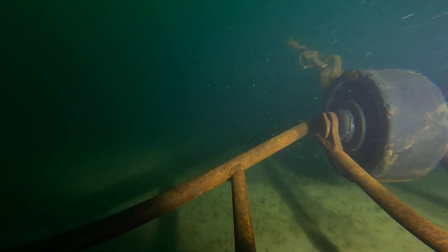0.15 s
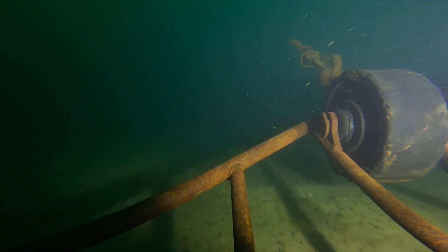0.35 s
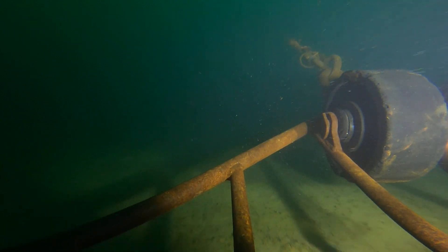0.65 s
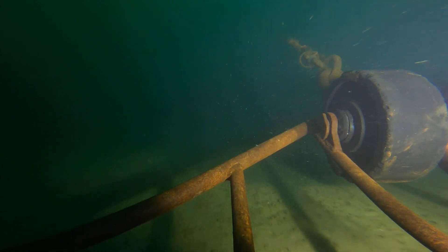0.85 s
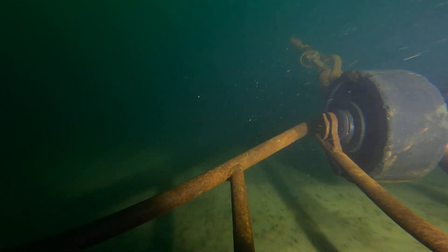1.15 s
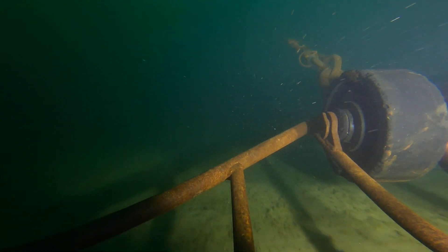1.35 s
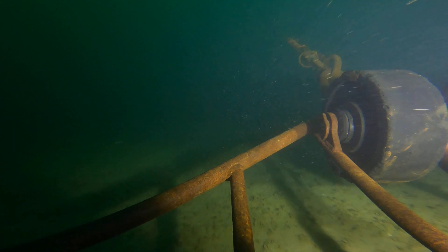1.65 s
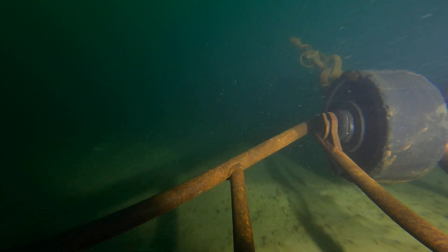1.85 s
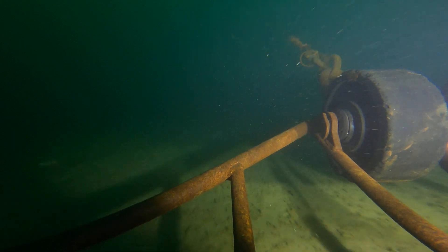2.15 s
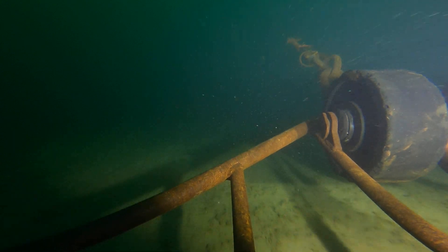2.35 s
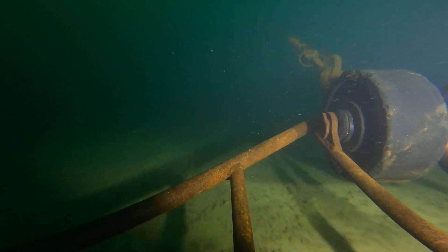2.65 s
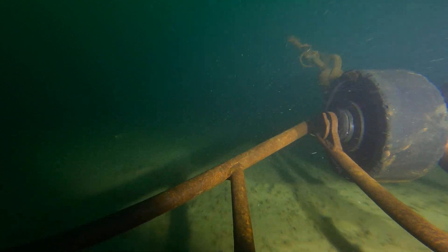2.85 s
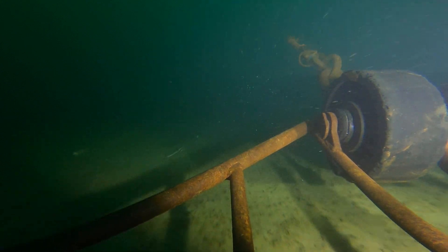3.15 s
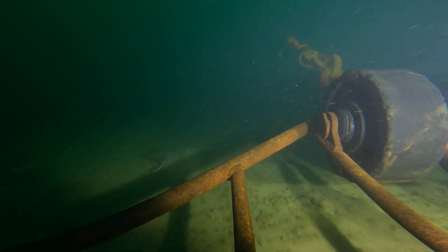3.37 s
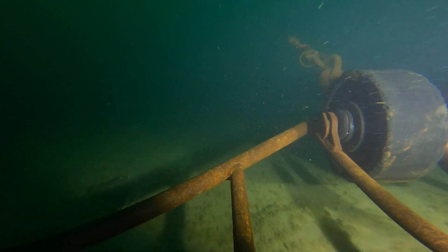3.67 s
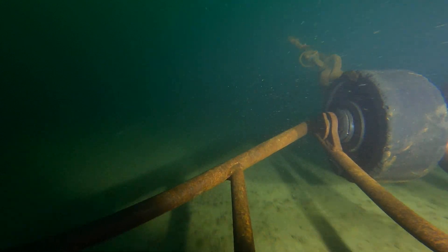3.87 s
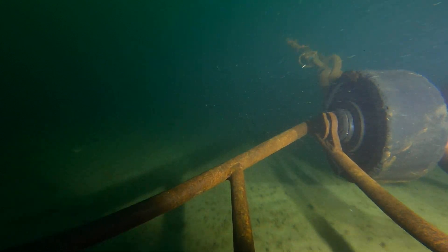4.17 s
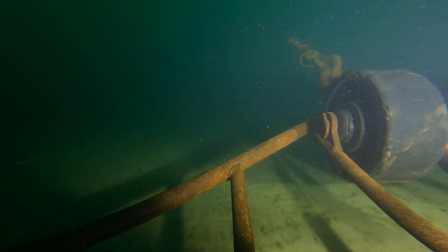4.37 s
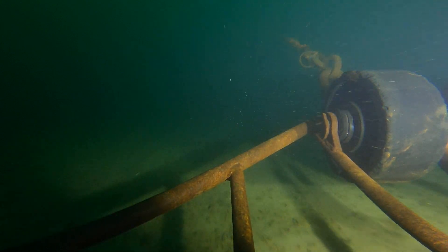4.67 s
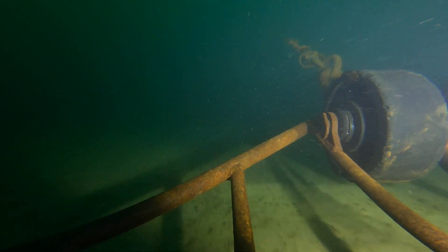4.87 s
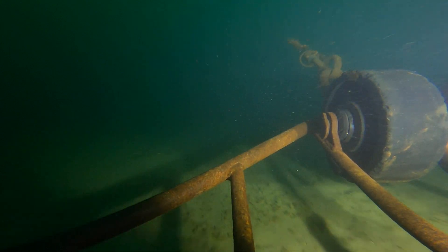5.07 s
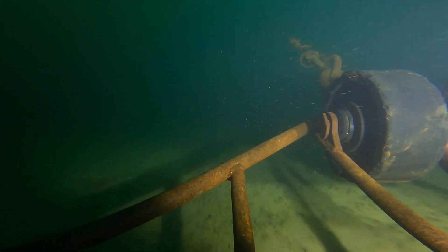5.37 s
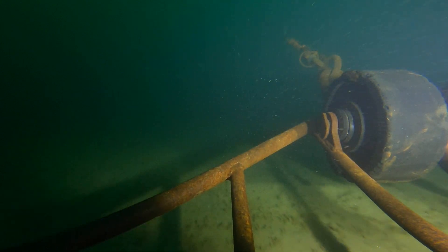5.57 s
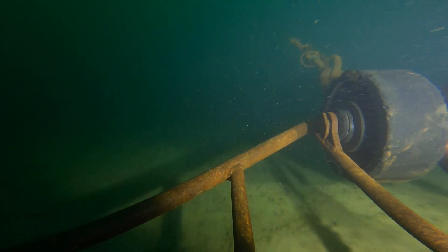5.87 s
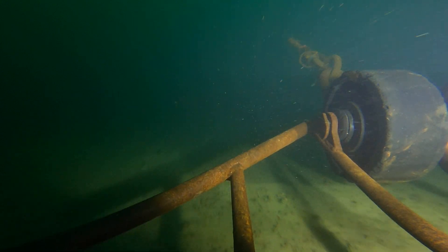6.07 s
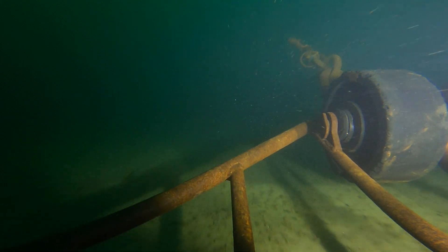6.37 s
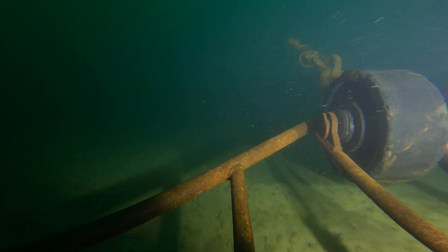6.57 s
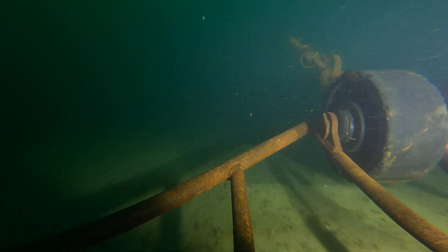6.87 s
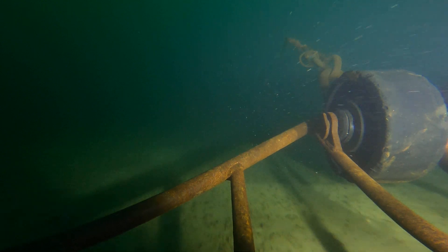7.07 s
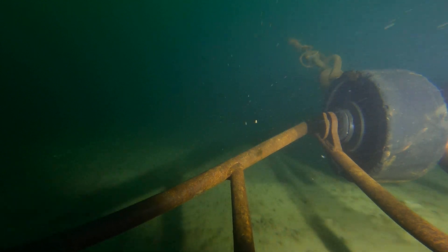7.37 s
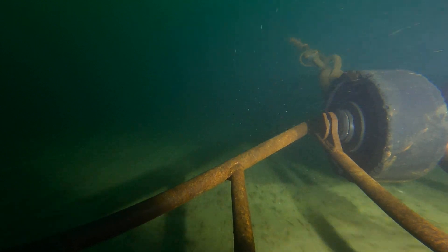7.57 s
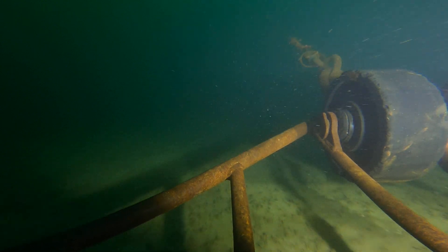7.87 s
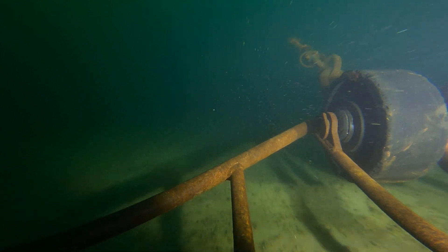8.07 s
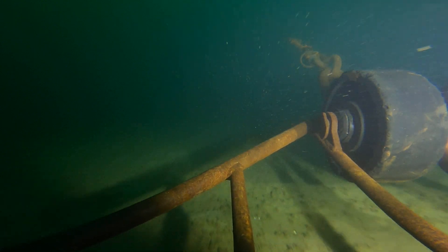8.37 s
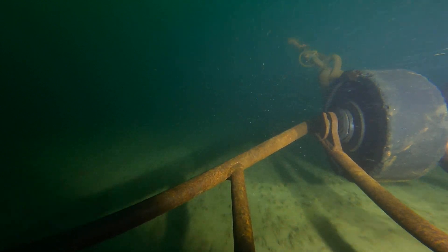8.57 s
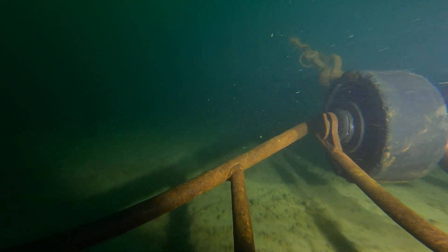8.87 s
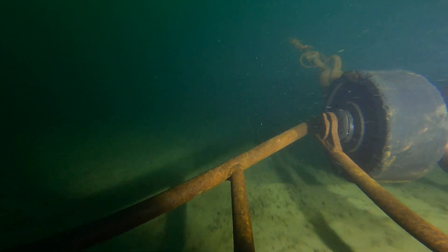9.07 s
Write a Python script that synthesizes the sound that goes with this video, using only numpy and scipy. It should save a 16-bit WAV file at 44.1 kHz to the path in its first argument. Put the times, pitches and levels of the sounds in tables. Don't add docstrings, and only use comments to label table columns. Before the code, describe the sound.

A metal frame is towed along a sandy seabed, heard through its own mount by a sealed stereo device. A deep wobbling drone dominates, fluttering and briefly dropping out. Over it come grainy dragging, short ringing metallic knocks, stone snaps, shell cracks and loose-link ticks at random intervals. Occasional low lurches swell the rumble; quick level control keeps everything dense and even.

```python
import sys
import numpy as np
from scipy import signal
from scipy.io import wavfile

SR = 44100
rng = np.random.default_rng(int(sys.argv[2]) if len(sys.argv) > 2 else 0)


def bounce(signal):
    frames = np.transpose(np.atleast_2d(signal))
    limited = np.clip(frames, -1, 1)
    pcm = np.round(limited * 32767).astype(np.int16)
    wavfile.write(sys.argv[1], SR, pcm)


def natural_amplitude(level_db):
    exponent = np.asarray(level_db, float) / 20
    return 10 ** exponent


N = 407043
MID_HZ, HIGH_HZ, TOP_HZ = 2000, 3300, 5600


def rms_one(x):
    return x / np.sqrt(np.mean(x ** 2) + 1e-20)


def in_time(rows):
    s, *columns = np.transpose(rows)
    return [np.interp(np.arange(N) / SR, s, column) for column in columns]


def drift(rate):
    r = np.exp(-80 * np.pi * rate / SR)
    slow = signal.lfilter([1], [1, -2 * r, r * r], rng.standard_normal(N // 40 + 2002))[2000:]
    return np.interp(np.arange(N) / 40, np.arange(len(slow)), rms_one(slow))


def cut(x, hz, kind, order):
    return signal.sosfilt(signal.butter(order, hz, kind, fs=SR, output="sos"), x)


def resonate(x, hz, width_hz):
    r, w = np.exp(-np.pi * width_hz / SR), 2 * np.pi * hz / SR
    return signal.lfilter([2 * (1 - r) * np.sin(w)], [1, -2 * r * np.cos(w), r * r], x)


def shaken(hz, width_hz):
    noise = rng.standard_normal(N + SR)
    return rms_one(resonate(resonate(noise, hz, width_hz), hz, width_hz)[SR:])


def contacts(table, ring_ms):
    found = []
    for s, level_db, rise_ms, fall_ms, colour_db in table:
        rise_ms, fall_ms = max(rise_ms, .1), max(fall_ms, .3)
        ms = np.arange(-5 * rise_ms, 6 * fall_ms, 1000 / SR)
        force = natural_amplitude(level_db - 5.08 * np.where(ms < 0, -ms / rise_ms, ms / fall_ms))
        force = force * np.sqrt(1 + ring_ms / (rise_ms + fall_ms))
        found.append((int(s * SR + ms[0] * SR / 1000), force, colour_db))
    return found


def add(track, found, boost_db, colour_share, scatter_db):
    luck = rng.standard_normal(len(found))
    for (at, force, colour_db), chance in zip(found, luck):
        gain = natural_amplitude(boost_db + colour_share * colour_db + scatter_db * chance)
        track[at:at + len(force)] += (force * gain)[:N - at]


# [t/s, level/dB]
LURCHES = [
    (0.038, -20),
    (2.094, -13),
    (2.663, -16),
    (4.584, -18.5),
    (5.103, -14),
    (5.978, -22.5),
]


def rumble():
    lurch_ms, lurch_boost_db = 46, 10
    band = signal.butter(2, [18, 75], "band", fs=SR, output="sos")
    t, level = np.arange(N) / SR, natural_amplitude(-25.5)
    for s, db in LURCHES:
        bell = np.exp(-((t - s) * 1000 / lurch_ms - 1) ** 2)
        level = level + natural_amplitude(db - 15.5 + lurch_boost_db) * bell
    return level * rms_one(signal.sosfilt(band, rng.standard_normal(N + SR))[SR:])


# [t/s, length/s, level/dB]
SAND_SWELLS = [(0.163, 0.051, -30.5), (0.383, 0.044, -28.5), (0.523, 0.095, -26.5), (0.722, 0.08, -34),
               (0.885, 0.27, -32), (1.567, 0.082, -23), (1.853, 0.14, -27), (2.042, 0.034, -26.5),
               (2.212, 0.22, -25), (2.618, 0.1, -36), (2.842, 0.34, -28.5), (3.347, 0.12, -23.5),
               (4.51, 0.062, -25.5), (4.93, 0.059, -31.5), (5.176, 0.036, -28.5), (5.5, 0.038, -26.5),
               (5.682, 0.1, -30), (5.87, 0.085, -28), (6.138, 0.21, -25.5), (6.75, 0.046, -29),
               (6.9, 0.31, -28), (7.363, 0.37, -22.5), (7.87, 0.078, -35), (8.1, 0.049, -24.5),
               (8.473, 0.043, -31), (8.59, 0.048, -31), (8.702, 0.058, -26.5), (8.936, 0.21, -22.5)]


def swells():
    rise_s, fall_s, rest_db = 0.023, 0.02, -35.5
    t, power = np.arange(N) / SR, natural_amplitude(2 * rest_db)
    for s, length_s, db in SAND_SWELLS:
        before = np.maximum((s - t) / rise_s, 0)
        after = np.maximum((t - s - length_s) / fall_s, 0)
        power = power + natural_amplitude(2 * db) * np.exp(-2 * np.minimum(before + after, 20))
    return np.sqrt(power)


# [t/s, f/Hz, level/dB]
HUM_PITCH = [(0.0, 93.15, -15), (1.02, 91.4, -14), (1.07, 96.2, -14.5), (2.38, 95.3, -14.5),
             (2.48, 102.1, -13.5), (2.74, 93.06, -14), (5.68, 93.5, -15.5), (5.81, 98.73, -15.5),
             (6.07, 89.87, -14.5), (6.37, 98.1, -13), (6.68, 94.3, -15.5), (6.89, 99.8, -12.5),
             (7.07, 92.2, -16), (7.42, 94.6, -15.5), (7.55, 90.25, -15), (7.73, 92.46, -12),
             (8.93, 92.4, -16), (9.19, 89.1, -15)]
# [t/s, half width/ms, share left (+ makes the pitch leap up)]
HUM_NULLS = [(0.306, 17, -0.0033), (0.414, 26, -0.22), (0.492, 20, 0.2), (0.575, 17, 0.4),
             (0.628, 8.2, -0.6), (0.686, 24, -0.28), (0.73, 7.1, 0.3), (0.82, 11, 0.16), (1.092, 12, 0.25),
             (1.144, 6.6, 0.25), (1.35, 20, -0.47), (1.456, 21, 0.4), (1.973, 2.4, 0.46), (2.087, 16, -0.3),
             (2.127, 6.9, 0.26), (2.228, 8.4, -0.3), (2.341, 24, 0.28), (2.479, 30, -0),
             (2.607, 32.9, -0.3), (2.638, 9.4, 0.4), (2.683, 15, -0.28), (2.988, 21, -0.3),
             (3.322, 11.3, -0.3), (3.371, 32, -0.15), (3.408, 11, -0.32), (3.573, 16, 0.3),
             (3.666, 24, 0.078), (3.851, 16, 0.42), (4.003, 27, 0.094), (4.055, 30, -0.38),
             (4.978, 7.5, -0.45), (5.02, 38, -0.29), (5.155, 23, -0.035), (5.349, 13.5, -0),
             (5.485, 6.8, 0.0051), (5.687, 27, 0), (5.902, 7.6, 0.4), (6.009, 7.5, 0.32), (6.127, 10, 0.1),
             (6.246, 30, -0.4), (6.329, 9, -0), (6.378, 9.7, 0.4), (6.432, 9.6, 0.5), (6.844, 24.2, 0.13),
             (6.874, 6.6, 0.03), (6.913, 23, -0.64), (7.438, 13, 0.5), (7.531, 11, -0.35),
             (7.748, 35, 0.68), (7.823, 27, 0.07), (7.881, 17, 0.1), (7.945, 15, 0.4), (8.05, 8.7, -0.13),
             (8.097, 33, 0), (8.296, 39, -0.3), (8.418, 13, 0.37), (8.719, 25, -0.2), (8.801, 12, -0.6),
             (9.013, 4.3, 0.2), (9.213, 2.3, 0.12)]


def hum():
    pitch_hz, first_db = in_time(HUM_PITCH)
    swing = np.sqrt(2) * np.exp(2j * np.pi * np.cumsum(pitch_hz + 2.53 * drift(8.9)) / SR)
    for s, half_ms, left in HUM_NULLS:
        reach = 1.4 * half_ms * SR / 1000
        start, stop = max(int(s * SR - 4 * reach), 0), min(int(s * SR + 4 * reach), N)
        u = (np.arange(start, stop) - s * SR) / reach
        swing[start:stop] *= np.tanh(u) - 1j * left / np.cosh(u)
        swing[:start] *= -1
    first = swing.imag + natural_amplitude(-13) * shaken(108, 24) + natural_amplitude(-11.5) * shaken(78, 27)
    second = shaken(174.7, 12.2) + natural_amplitude(-6.0) * shaken(183.4, 47)
    return natural_amplitude(first_db + 3.5) * first + swells() * second


# [t/s, level/dB]
RIPPLE_DROPS = [(0.564, -37), (0.731, -50), (1.122, -55), (1.5, -52), (1.829, -40), (3.081, -44),
                (3.33, -33.5), (3.865, -63), (4.09, -46), (4.716, -39), (4.941, -50), (5.649, -47),
                (6.738, -48), (7.917, -50), (8.105, -65), (8.922, -34)]


def thuds():
    force = natural_amplitude(-52.5 + 3.5 * drift(10))
    add(force, contacts([(s, db, 3.0, 14.0, 0) for s, db in RIPPLE_DROPS], 34.0), -1.5, 0, 0)
    return natural_amplitude(27.0) * cut(resonate(force * rng.standard_normal(N), 300, 210), 420, "low", order=4)


# [t/s, level/dB]
PORT_GRAINS = [
    (0.1027, -55.5),
    (0.282, -56),
    (2.0882, -56),
    (2.2044, -60),
    (5.421, -57.5),
    (6.003, -45.5),
    (7.3951, -58),
    (8.7161, -63),
    (8.9542, -53.5),
]


def sparks():
    force = np.zeros(N)
    add(force, contacts([(s, db, .4, 2.5, 0) for s, db in PORT_GRAINS], 0), 3.0, 0, 0)
    both, apart = force * rng.standard_normal((2, N))
    hiss = np.array([both + .3 * apart, both - .3 * apart])
    return cut(cut(hiss, 9500, "high", order=4), 14000, "low", order=4)


def grains():
    strikes = rng.random(N) < 300 * natural_amplitude(5 * drift(14)) / SR
    strength = natural_amplitude(6.7 * np.minimum(rng.exponential(1, N), 3.2))
    return rms_one(signal.lfilter([1], [1, -.97], strikes * strength))


# [t/s, level/dB, fall/ms]
BUMPS = [(.545, -18, 4.6), (1.406, -18, 5), (1.541, -20, 8), (1.841, -15, 9.5), (2.154, -15, 8.5),
         (2.461, -18.5, 4), (2.705, -16.5, 7), (2.945, -12.5, 6.3), (3.079, -16.5, 13), (3.148, -20.5, 9),
         (3.327, -17, 45), (3.569, -27, 5.6), (3.628, -25, 3.1), (3.865, -21, 15), (4.126, -21, 5.8),
         (4.277, -21, 2.5), (4.487, -17, 5.4), (5.288, -20.5, 2.82), (5.613, -24.5, 12), (5.87, -18.5, 7.6),
         (6.569, -19, 18), (6.886, -15, 6.9), (6.97, -19, 6.3), (7.589, -17.5, 11.3), (7.962, -22, 30),
         (8.105, -15.5, 7.9), (8.216, -23.5, 4.72), (8.598, -14.5, 11.2), (8.615, -22, 0.67),
         (9.018, -15.5, 15)]
# [t/s, level/dB, fall/ms]
CLACKS = [(.062, -24, 15), (.398, -25.5, 10), (.923, -29, 5.9), (1.094, -31, 3.2), (1.332, -23.5, 6.4),
          (1.953, -17, 12), (2.114, -20.5, 12), (2.295, -16.5, 17), (2.839, -18, 23), (3.226, -13.5, 8.7),
          (4.252, -13, 6.3), (4.709, -14, 7.1), (5.105, -27, 22.5), (5.341, -16.5, 22), (5.407, -12, 12.5),
          (5.773, -17, 8.4), (6.134, -14, 21), (6.196, -15, 5.2), (6.943, -17, 8.4), (7.191, -28, 5.8),
          (7.402, -14, 10.3), (7.472, -19, 7.27), (7.846, -19.5, 5.5), (7.922, -22, 3.9),
          (8.148, -16.5, 2.9), (8.297, -28.5, 14), (8.429, -18, 14), (8.448, -26.5, 12), (8.954, -17, 26),
          (9.157, -23, 10.5)]
# [t/s, level/dB, fall/ms]
SNAPS = [(.129, -41, 0.79), (.91, -26, 1.5), (1.17, -28, 3.5), (1.281, -26.5, 1.5), (2.733, -15.5, 5),
         (3.492, -20, 4), (4.607, -25.5, 22), (4.817, -29, 1.3), (4.852, -38, 0.92), (4.946, -31.5, 5.1),
         (5.18, -21.5, 5.3), (5.856, -20.5, 1.5), (6.003, -16.5, 4.7), (6.112, -21.5, 6),
         (6.156, -22.5, 1.1), (7.67, -20, 1.8), (8.706, -26, 8.2), (4.594, -31, 3.3), (4.36, -40, 4.5),
         (8.848, -24.5, 2.44), (9.113, -22.5, 0.51)]
# [t/s, level/dB]
RUBS = [
    (.31, -45),
    (.815, -36),
    (.955, -29.5),
    (2.572, -24),
    (6.276, -38),
    (6.37, -27),
    (6.456, -36),
    (7.336, -26.5),
    (8.545, -24),
    (1.625, -36),
]


def knocks():
    bump_mid_db, clack_mid_db, snap_mid_db = -20.5, -10, -1
    table = []
    for hits, mid_db in [(BUMPS, bump_mid_db), (CLACKS, clack_mid_db), (SNAPS, snap_mid_db)]:
        table += [(s, db, 1.1, fall_ms, mid_db) for s, db, fall_ms in hits]
    table += [(s, db, 3.0, 5.7, bump_mid_db) for s, db in RUBS]
    return contacts(table, 10.0)


# [t/s, level/dB, fall/ms]
LINK_TICKS = [(.082, -32, 0.58), (.588, -32, 0.88), (1.314, -42, 2.9), (2.295, -22, 4.1), (2.841, -26, 2.6),
              (3.117, -37.5, 1.2), (3.504, -36.5, 1.6), (4.249, -29, 3), (5.342, -28.5, 6.3),
              (5.773, -39, 4.6), (6.134, -22, 1.7), (6.156, -32, 4.8), (7.406, -23.5, 3), (7.545, -35, 1.5),
              (7.863, -42.5, 2), (8.142, -34, 3.1), (8.43, -23, 2.7), (8.504, -35, 1.3), (9.019, -18, 2.7)]
# [t/s, level/dB, fall/ms]
SHELL_CRACKS = [(.102, -27, 0.65), (.251, -32.5, 4.8), (.298, -41.5, 21), (.91, -31.5, 1.7),
                (1.171, -41.5, 2.7), (1.481, -31.5, 1.6), (2.44, -32, 1.6), (2.736, -25, 1.3),
                (2.944, -35.5, 2.5), (3.178, -36, 1.3), (3.265, -40, 1.8), (3.329, -42, 1.2),
                (3.452, -35, 3.4), (4.621, -25.5, 2.3), (4.818, -36, 1.1), (5.15, -30.5, 5.4),
                (5.38, -34, 10), (5.555, -37, 8.8), (5.858, -30, 1.5), (6.003, -18, 1.2), (6.366, -44, 2.1),
                (6.453, -37.5, 5.2), (6.548, -42, 1.36), (6.813, -37.5, 4.9), (6.945, -33.5, 7.95),
                (7.137, -42, 5.77), (7.479, -34, 8.8), (7.669, -35, 2.21), (8.565, -45, 1.83),
                (8.954, -23, 11)]
# [t/s, level/dB, half length/ms]
SAND_SCUFFS = [(1.86, -39.5, 68), (2.112, -24.5, 6.2), (3.404, -34, 11), (5.17, -34, 6.7),
               (5.428, -19.5, 3.5), (6.046, -31.5, 7.8), (6.066, -30.5, 2.3), (6.409, -26, 4.7),
               (6.617, -30.5, 8.4), (8.646, -45, 1.5), (8.719, -33.5, 2.1)]


def ticks():
    link_top_db, shell_top_db, scuff_top_db = -33.5, -20, -17.5
    table = []
    for hits, top_db in [(LINK_TICKS, link_top_db), (SHELL_CRACKS, shell_top_db)]:
        table += [(s, db, 0.62, fall_ms, top_db) for s, db, fall_ms in hits]
    table += [(s, db, half_ms, half_ms, scuff_top_db) for s, db, half_ms in SAND_SCUFFS]
    return contacts(table, 14.4)


# [t/s, level/dB]
PEBBLE_TAPS = [(0.7956, -26), (1.1712, -29), (2.2823, -16), (2.441, -27), (3.0874, -36), (3.3268, -27),
               (3.5057, -18), (3.6292, -35), (4.5926, -31), (5.1322, -25), (7.0324, -32), (7.5442, -25),
               (7.6704, -24), (7.783, -33), (7.8512, -29), (7.9727, -29), (8.102, -32.5), (8.324, -27.5),
               (8.5644, -27.5), (8.6234, -34), (8.6413, -29), (8.706, -26)]


def taps():
    boost_db, softness = 47, .8
    clicks = np.zeros(N)
    for s, db in PEBBLE_TAPS:
        clicks[int(s * SR)] = natural_amplitude(db + boost_db)
    return signal.lfilter([1 - softness], [1, -softness], clicks)


# [t/s, dragging level/dB, spray level/dB]
GROUND = [(0.0, -30, -54), (0.44, -36, -55), (0.79, -31, -51), (1.36, -34.5, -56.5), (1.75, -32, -54.5),
          (2.21, -31, -52), (3.21, -37, -51.5), (3.6, -36, -52.5), (4.22, -34, -52), (4.52, -26.5, -50.5),
          (4.7, -32, -47), (5.04, -36.5, -53.5), (5.29, -31, -50.5), (5.76, -32, -54.5), (6.53, -29, -51.5),
          (7.97, -35, -56.5), (8.71, -34, -52.5), (9.23, -30.5, -45.5)]
# [f/Hz, width/Hz, level/dB, left over right/dB, left lag/ms]
BAR_MODES = [(512.5, 19, -7.5, 8.5, 0.15), (549.4, 62, -4, 3, 0.2), (744, 44, -2, 4, 0.25),
             (826, 89, -3, 3.5, 0.099), (925, 43.5, 2.5, -1.5, 0.19), (1017, 47, -4, -2, 0.061),
             (1209, 73, -2.5, 10.5, 0.1), (1223.6, 43, 0, 2, -0.012), (1372, 140, -10.5, -2.5, -0.016),
             (1531, 102, -8, 2, -0.021), (1670, 99, -26.5, -22, 0.065), (1790, 79, -15, 8.5, -.03)]
# [f/Hz, width/Hz, level/dB, left over right/dB, left lag/ms]
BRACKET_MODES = [
    (2051, 54, -14, 8, -0.024),
    (2530, 33, -14, 5, -0.022),
    (2656, 107, -10.5, 6, 0.062),
    (3018, 170, -14, 3.5, -0.025),
]
# [f/Hz, width/Hz, level/dB, left over right/dB]
HOUSING_MODES = [(3650, 82, -22, 14), (4117, 74, -31, -9), (4700, 92, -29.5, -1.5), (4815, 840, -27, -5),
                 (4800, 1200, -29.5, 2), (6450, 160, -26, -7), (7590, 350, -26, 4),
                 (7440, 220, -46.5, -0.5), (8810, 260, -41, -2), (9870, 310, -46.5, -5.5),
                 (12500, 4000, -75.5, 0)]
ALL_MODES = [tuple(mode) for mode in [*BAR_MODES, *BRACKET_MODES]] + [(*mode, 0) for mode in HOUSING_MODES]


def frame():
    drag_db, spray_db = in_time(GROUND)
    knock_list, tick_list, tap_force, grit = knocks(), ticks(), taps(), grains()
    lumps_db = 1.6 * drift(30) + .7 * drift(6)
    bars, housing, ports = np.zeros((3, 2, N))
    time = np.arange(N)
    for hz, width_hz, level_db, lean_db, lag_ms in ALL_MODES:
        spray_share = np.clip((hz - 1500) / 2200, 0, 1)
        own = np.roll(grit, rng.integers(N))
        ground_db = (1 - spray_share) * (drag_db + 19.5) + spray_share * (spray_db + 40.0)
        uneven = 1 - .55 * spray_share
        force = natural_amplitude(ground_db + uneven * (lumps_db + 2.4 * drift(12.4)))
        force = force * (.38 + uneven * (.3 * grit + .6 * own))
        if hz < HIGH_HZ:
            add(force, knock_list, 11.5 if hz < MID_HZ else 22, hz > MID_HZ, 3.5)
        if 4000 < hz < 4800:
            add(force, tick_list, 25, -.6, 1.5)
        elif hz > MID_HZ:
            boost_db = 21 if hz < HIGH_HZ else 36 if hz < TOP_HZ else 43
            top_share = (hz > HIGH_HZ) * .5 + (hz > TOP_HZ) * .5
            add(force, tick_list, boost_db, top_share, 3.0)
        both, apart = rng.standard_normal((2, N)) * force
        both = both + tap_force * (hz > MID_HZ)
        apart = apart * (.16 if hz < HIGH_HZ else .2 if hz < 10000 else .4)
        left, right = natural_amplitude(level_db) * resonate(np.array([both + apart, both - apart]), hz, width_hz)
        if hz < HIGH_HZ:
            left = np.interp(time - lag_ms * SR / 1000, time, left)
        part = bars if hz < HIGH_HZ else housing if hz < 8000 else ports
        part += natural_amplitude([[lean_db / 2], [-lean_db / 2]]) * [left, right]
    bars = cut(cut(bars, 2910, "low", order=6), 450, "high", order=3)
    return bars + cut(housing, 7450, "low", order=6) + ports


# [t/s, f/Hz, level/dB]
BAR_PINGS = [(0.406, 1590, -25), (0.5452, 506, -16), (0.9582, 517, -18.5), (1.094, 1597, -19.5),
             (1.333, 1007, -18), (1.3357, 1500, -18.5), (1.406, 1228, -15), (1.541, 1264, -15),
             (1.8484, 1250, -18), (1.854, 1670, -20), (1.9537, 1450, -9.5), (2.1606, 1014, -14),
             (2.163, 1530, -14), (2.2958, 1225, -9), (2.4606, 1197, -13), (2.7068, 1465, -14),
             (2.7083, 867, -21), (3.086, 806, -22), (3.2403, 1220, -11.5), (3.4111, 1470, -18),
             (3.4133, 732.3, -21), (3.859, 1526, -22), (4.247, 1213, -13), (4.2772, 1540, -13),
             (4.3505, 1580, -18), (4.4061, 787, -16), (4.5932, 637, -16.5), (4.5919, 950, -14),
             (4.7136, 1200, -21.5), (4.9464, 777, -15), (5.2922, 1227, -9), (5.348, 1263, -21),
             (5.77, 1025, -18), (5.7773, 1456, -11.5), (5.8712, 735, -18), (6.001, 1170, -12),
             (6.1552, 1204, -8), (6.1998, 1505, -12.5), (6.635, 1750, -22), (6.8877, 1230, -13),
             (6.9463, 1780, -19), (7.1898, 1603, -19.5), (7.392, 513, -18.5), (7.4042, 1730, -23.5),
             (7.405, 1220, -19), (7.476, 1523, -14.5), (7.5948, 847, -11.5), (8.4313, 1240, -10.5),
             (8.4481, 810, -15), (8.5764, 1148, -15), (8.6151, 800, -11.5), (8.719, 1232, -15.5),
             (8.984, 1780, -21), (8.995, 1400, -20)]
# [t/s, f/Hz, level/dB]
BRIGHT_PINGS = [(0.0813, 4910.0, -32.8), (0.1021, 5530.0, -35.4), (0.588, 3000, -30), (0.589, 4700, -35),
                (1.9582, 2350.0, -30.4), (2.1119, 4570.0, -30.2), (2.1123, 2560.0, -26.9),
                (2.3131, 2780.0, -28.4), (2.7352, 2650.0, -27.0), (2.7356, 4050.0, -33.3),
                (2.8388, 4110.0, -33.0), (3.5053, 2920.0, -20), (4.2486, 4690.0, -30.4),
                (4.6203, 2650.0, -22.0), (4.818, 2700, -30), (5.1811, 2560.0, -24.2),
                (5.3409, 2020.0, -24.9), (5.3414, 4130.0, -27.9), (5.4256, 3600.0, -33.0),
                (5.4276, 4910.0, -27.4), (5.4316, 7770.0, -37.5), (5.4336, 4180.0, -30.3),
                (5.7784, 2990.0, -29.9), (5.7789, 2370.0, -29.0), (5.857, 4930.0, -29.9),
                (5.8574, 2670.0, -26.2), (6.0027, 3600.0, -26.1), (6.0031, 7670.0, -29.7),
                (6.0035, 5020.0, -24.1), (6.0039, 6460.0, -29.2), (6.0045, 2560.0, -21.2),
                (6.0611, 2560.0, -27.1), (6.1145, 2760.0, -26.3), (6.1334, 4690.0, -25.8),
                (6.134, 4130.0, -25.9), (6.1565, 2690.0, -26.4), (6.172, 2700, -29),
                (7.4054, 4690.0, -29.4), (8.4287, 5840.0, -33.6), (8.504, 2800, -30), (8.565, 2900, -32),
                (8.716, 4720.0, -33.1), (8.9537, 7840.0, -36.9), (8.9553, 3060.0, -23.5),
                (8.956, 3700.0, -31.4), (8.9564, 4630.0, -32.2), (8.9835, 2950.0, -30.3),
                (9.0176, 3510.0, -31.3), (9.0191, 4130.0, -24.1)]


def pings():
    rise_ms, fall_at_1k_ms, fall_slope, boost_db = 1.3, 9.0, .4, 1.5
    out, modes = np.zeros((2, N + SR)), np.array(ALL_MODES)
    ms = np.arange(SR // 10) * 1000 / SR
    for s, hz, db in [*BAR_PINGS, *BRIGHT_PINGS]:
        lean_db, lag_ms = modes[np.argmin(np.abs(modes[:, 0] - hz)), 3:]
        lag_ms = lag_ms * (hz < HIGH_HZ)
        fall_ms = fall_at_1k_ms * (1000 / hz) ** fall_slope
        rise = 1 - np.exp(-ms * hz / 1000 / rise_ms)
        shape = natural_amplitude(db + boost_db) * rise * np.exp(-ms / fall_ms)
        ring = np.sin(2 * np.pi * hz / 1000 * (ms - [[lag_ms], [0]]))
        lean = natural_amplitude(np.clip(lean_db, -6, 6) * np.array([[.5], [-.5]]))
        at = int(s * SR - 20)
        out[:, at:at + len(ms)] += lean * shape * ring
    return out[:, :N]


def scene():
    low = (rumble() + hum() + thuds()) * natural_amplitude([[.25], [-.25]])
    return low + sparks() + frame() + pings()


def roll_off(x):
    return signal.sosfilt(signal.butter(12, 14700, fs=SR, output="sos"), x)


def record(dry):
    level_db = 20 * np.log10(np.abs(dry).max(axis=0) + 1e-6)
    fall_db = 150 * np.arange(N) / SR
    held_db = np.maximum.accumulate(level_db + fall_db) - fall_db
    r = np.exp(-1 / (.003 * SR))
    cut_db = signal.lfilter([1 - r], [1, -r], .62 * np.maximum(held_db + 9, 0))
    limited = .8 * np.tanh(dry * natural_amplitude(-cut_db) / .8)
    x = cut(limited, 14700, "low", order=8)
    fade = np.minimum(np.arange(N)[::-1] / (.006 * SR), 1)
    return roll_off(x * np.sin(np.pi / 2 * fade) ** 2)


dry = scene()
out = record(dry)
bounce(out)
```